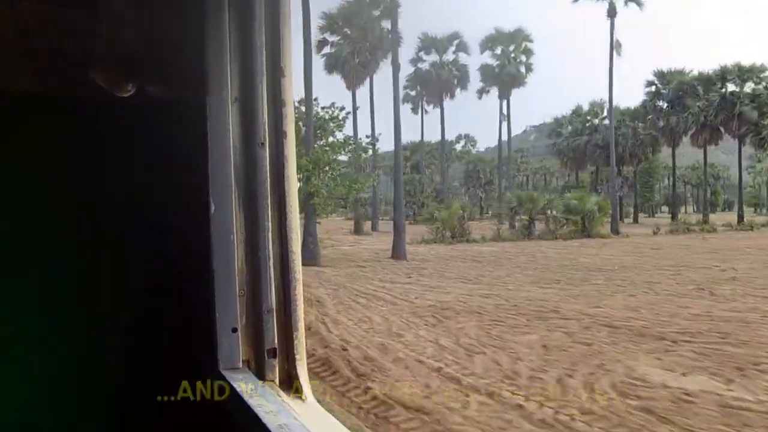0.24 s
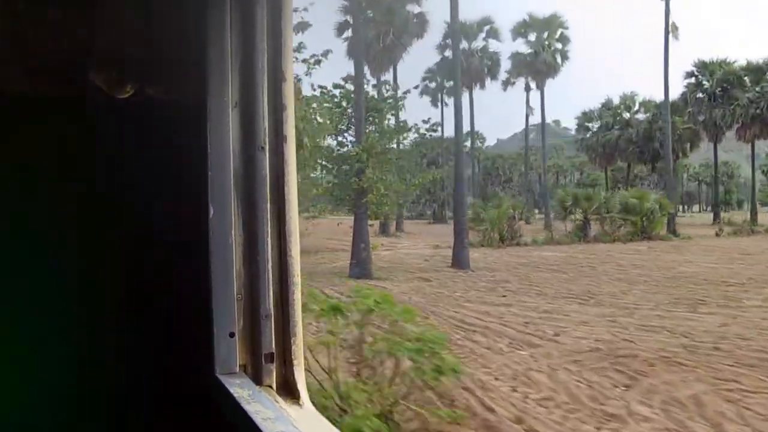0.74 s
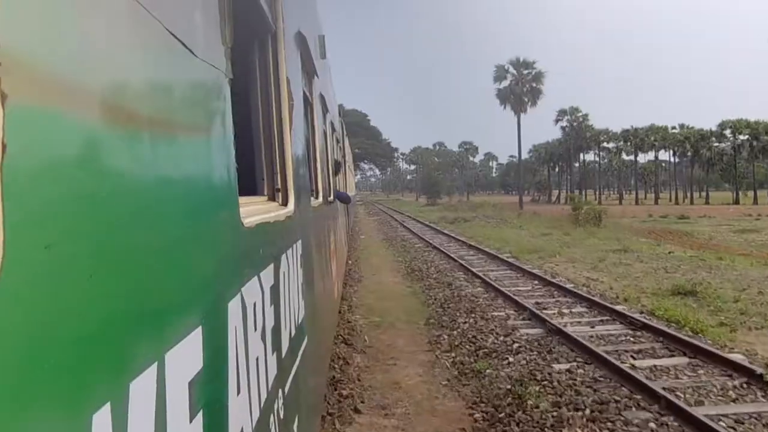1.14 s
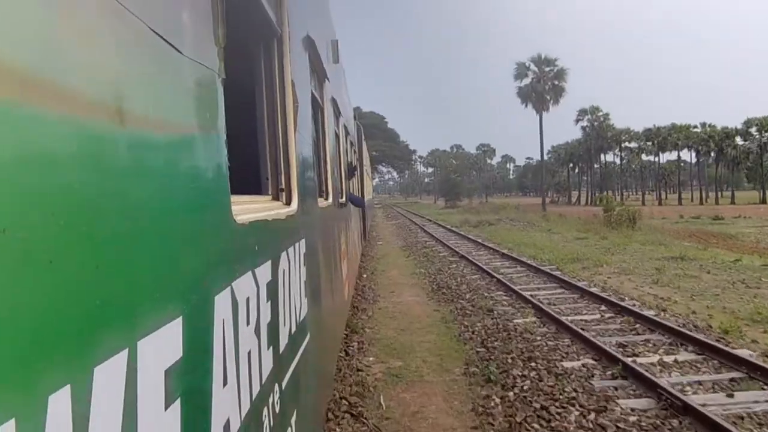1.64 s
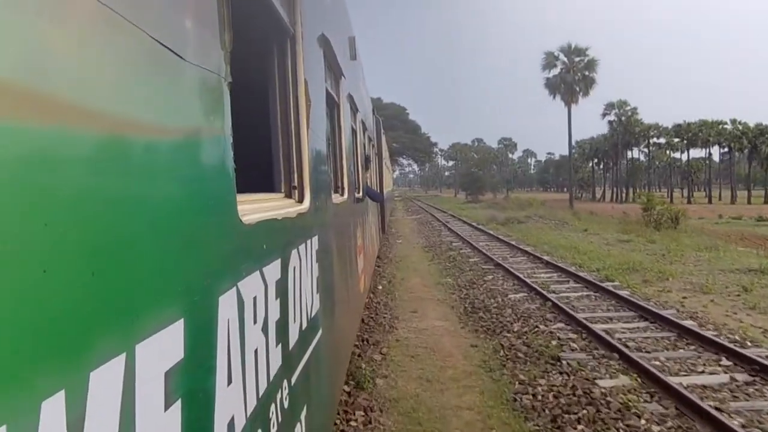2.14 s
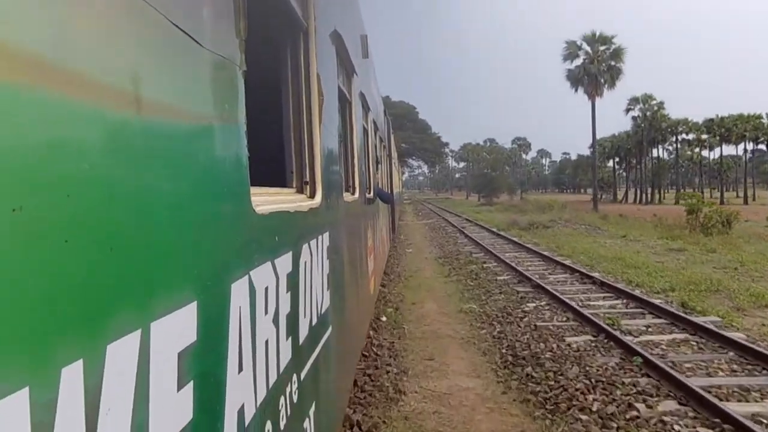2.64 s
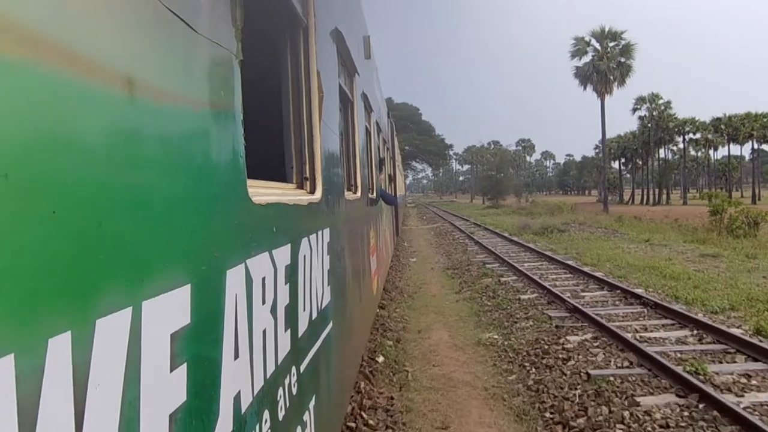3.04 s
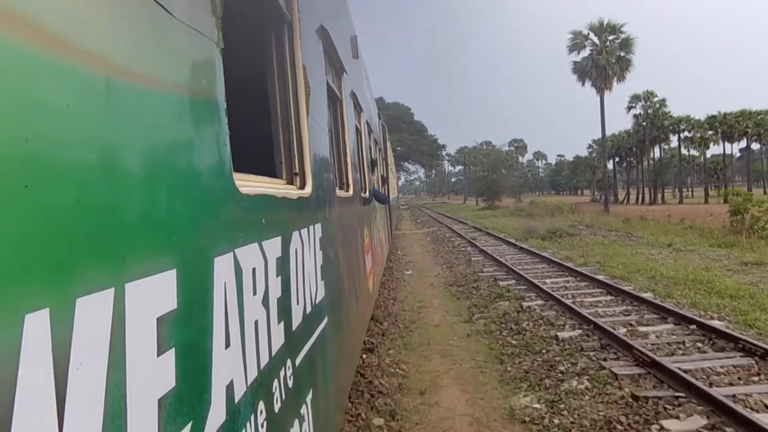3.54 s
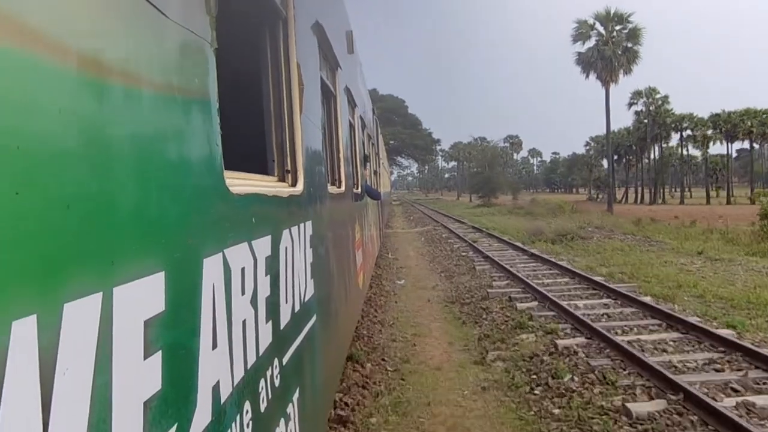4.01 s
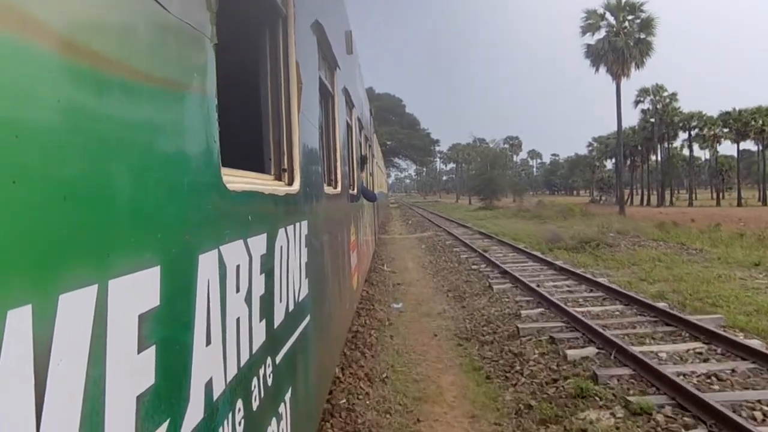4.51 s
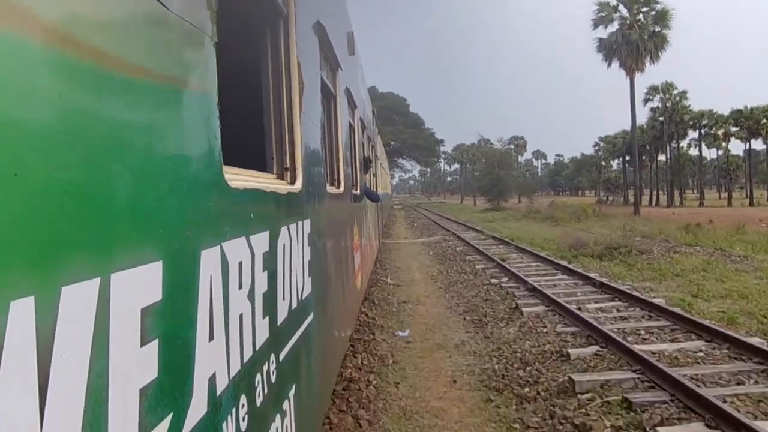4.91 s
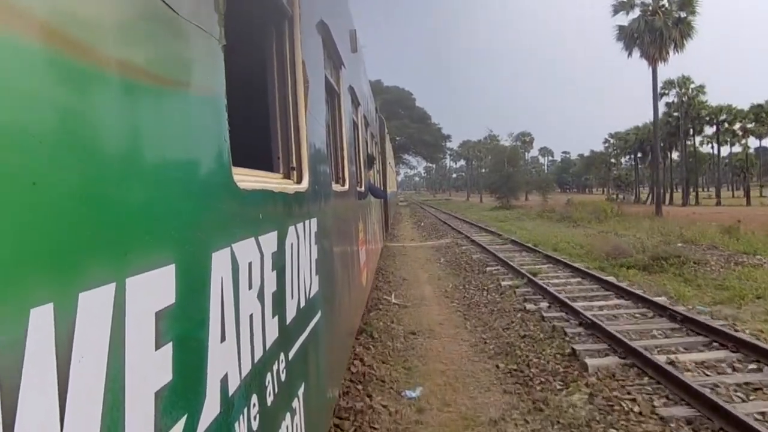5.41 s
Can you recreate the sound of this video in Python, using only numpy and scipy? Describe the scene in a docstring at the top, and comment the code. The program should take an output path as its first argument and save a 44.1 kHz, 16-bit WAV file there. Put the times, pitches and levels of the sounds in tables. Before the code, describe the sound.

Wind buffets the microphone in crackling gusts over the steady roar of a moving train.

```python
"""A train rolls on rough rails, heard just inside a window, then outside along the carriage, and for
a last instant in shelter. Wheels and wind make one mid-pitched roar. The slipstream strikes the
microphone's port: small eddies crackle and excite its cavity resonances, larger ones slap, thump and thud.
A low rumble and a faint hiss lie underneath, and the highest peaks saturate the recorder."""
import sys
import numpy as np
from scipy import signal
from scipy.fft import rfft, irfft
from scipy.io import wavfile
from scipy.ndimage import uniform_filter1d

SR = 44100
rng = np.random.default_rng(int(sys.argv[2]) if len(sys.argv) > 2 else 0)


def persist_wave(psi):
    """Save psi, clipped to +-1, as 16-bit WAV."""
    counts = np.round(np.clip(psi, -1, 1) * 32767).astype(np.int16)
    wavfile.write(sys.argv[1], SR, np.atleast_2d(counts).T)


N = 249667
TIME = np.arange(N) / SR
FREQS = np.maximum(np.fft.rfftfreq(N, 1 / SR), 1)


# Spectrum of the roar of train and wind. Each row: frequency in Hz, relative level in dB.
ROAR_SPECTRUM = [(60, -11.5), (250, -12.5), (450, -6.5), (590, 1.5), (700, 2.5), (850, 1.5), (1000, -2),
                 (1170, -1.5), (1330, -11.5), (1900, -18), (2700, -7.5), (3100, -6.5), (3600, -15.5),
                 (4500, -23), (5300, -26.5)]

def train_and_wind_roar(level_db):
    """Broadband noise: rough wheels on rough rails and the wind blend in a slightly shuddering roar."""
    roar = coloured(rng.standard_normal(N), ROAR_SPECTRUM, 500, 1200)
    return roar * from_db(level_db + 1.3 * drift(rate_hz=27))


# Spectrum of the small eddies. Each row: frequency in Hz, relative level in dB.
RUSH_SPECTRUM = [(100, -27), (400, 0.5), (900, 2), (1400, 3), (1800, 4.5), (2400, 1.5), (3000, -5.5),
                 (3500, -9.5), (4200, -13.5), (4600, -23), (5200, -19), (6000, -60)]

def rush(flow_db):
    """Fine-scale turbulence: small eddies crackle in clumps, louder and brighter in stronger flow."""
    level_db = flow_law(flow_db, cruise_db=-25, slope=1.014)
    treble_db = flow_law(flow_db, cruise_db=-1.8, slope=0.85)
    crackle = coloured(eddies(per_s=5000, spread_db=3.0), RUSH_SPECTRUM, 1400, 2600)
    treble = irfft(rfft(crackle) / (1 + (3500 / FREQS) ** 8), N)
    shelved = crackle + treble * (from_db(treble_db) - 1)
    return shelved * from_db(level_db + 1.6 * drift(rate_hz=47))


# Spectrum of the large eddies. Each row: frequency in Hz, relative level in dB.
BUFFET_SPECTRUM = [(30, -21.5), (70, -5.5), (130, 1), (330, 6), (550, 4.5), (900, -1), (1500, -25),
                   (3000, -29.5), (6000, -51)]

def buffeting(level_db):
    """Large-scale turbulence: the pressure of big eddies thumps on the port in uneven lumps."""
    thumps = coloured(eddies(per_s=1500, spread_db=2.5), BUFFET_SPECTRUM, 100, 450)
    return thumps * from_db(level_db + 0.73 * drift(rate_hz=45))


# Sharp slaps of air on the port. Each row: time in seconds, peak level in dB.
AIR_SLAPS = [(1.065, -6.5), (1.130, -4.5), (1.534, -2.5), (1.617, -0.5), (1.682, -12), (1.721, -3),
             (1.769, -6), (1.842, 0.5), (2.15, -4.5), (2.184, -0.5), (3.895, -4), (4.886, -6), (5.144, -3)]
# Deep thuds of the largest eddies. Each row: time in seconds, peak level in dB.
EDDY_THUDS = [(1.520, -16), (1.620, -12.5), (3.565, -12), (4.600, -10), (4.810, -10)]

def eddy_impacts(impacts, width_s, band_hz):
    """Pressure transients: single eddies swell and fade; larger ones last longer and sound lower."""
    pressure = np.zeros(N)
    t = TIME[:SR // 10] - TIME[SR // 20]
    envelope = np.exp(-(t / width_s) ** 2)
    band = signal.butter(6, band_hz, "band", fs=SR, output="sos")
    for time_s, peak_db in impacts:
        burst = signal.sosfilt(band, rng.standard_normal(len(t))) * envelope
        start = max(int(time_s * SR) - SR // 20, 0)
        pressure[start:start + len(t)] += from_db(peak_db) * burst / np.abs(burst).max()
    return pressure


# Spectrum of the rumble. Each row: frequency in Hz, relative level in dB.
RUMBLE_SPECTRUM = [(10, -20), (20, -4), (30, 2.5), (50, 0.5), (90, -2), (200, -18.5), (1000, -69)]

def rumble(level_db):
    """Wall-pressure fluctuation: the slowest swings along the carriage side are heard as a rumble."""
    gain = from_db(level_db + 1.5 * drift(rate_hz=6))
    return gain * coloured(rng.standard_normal(N), RUMBLE_SPECTRUM, 20, 70, window_samples=6000)


# Airflow just inside the window. Each row: time in seconds, strength in dB.
FLOW_AT_WINDOW = [(0.02, -29), (0.474, -37), (0.96, -32.5), (0.98, -32.5)]
# Airflow outside, along the carriage. Each row: time in seconds, strength in dB.
FLOW_OUTSIDE = [(1.06, -13), (1.42, -21.5), (1.52, -16.5), (1.82, -13.5), (2.24, -16.5), (2.34, -19),
                (2.55, -17.5), (2.6, -23), (2.66, -20), (2.87, -22), (3.16, -23), (3.69, -17.5),
                (3.74, -19.5), (4.0, -17.5), (4.11, -23.5), (4.19, -14.5), (4.27, -20.5), (4.72, -19.2),
                (5.05, -24.5), (5.14, -19), (5.34, -25.5), (5.58, -25)]

def airflow():
    """Wind shielding: the flow at the microphone, in dB, is strong outside and weak in shelter."""
    window_db = np.interp(TIME, *np.transpose(FLOW_AT_WINDOW))
    outside_db = np.interp(TIME, *np.transpose(FLOW_OUTSIDE))
    return by_position(window_db, outside_db, sheltered=-44)


# Gusts that break on the port. Each row: start in seconds, length in seconds,
# then the levels it adds to the buffeting, the rumble and the roar, in dB.
PORT_GUSTS = [(0.045, 0.026, -30, -32, -31), (0.165, 0.09, -35, -36, -29.5), (1.04, 0.018, -20.5, -44, -24),
              (1.128, 0.051, -18, -37, -25), (1.5, 0.041, -23, -24, -26), (1.608, 0.016, -11.5, -33, -18),
              (1.67, 0.04, -13.5, -29, -15), (1.814, 0.062, -16.5, -32, -14.5),
              (1.914, 0.037, -18, -32, -21), (1.994, 0.058, -17.5, -42, -21),
              (3.495, 0.053, -17.5, -30, -28), (3.653, 0.052, -19, -35, -27), (3.858, 0.022, -17, -46, -32),
              (3.972, 0.047, -23.5, -39, -31), (4.203, 0.061, -25, -36, -21.5),
              (4.365, 0.035, -24.5, -42, -19.5), (4.473, 0.34, -23, -38, -30),
              (5.297, 0.26, -32.5, -39, -30.5)]

def gusts(attack_s=0.011, release_s=0.028):
    """Intermittency: gusts build, hold and decay; their powers add to three level curves in dB."""
    power = np.full((3, N), 1e-12)
    for start_s, length_s, *levels_db in PORT_GUSTS:
        attack = np.clip(1 + (TIME - start_s) / attack_s, 0, 1)
        release = np.exp(-np.clip(TIME - start_s - length_s, 0, 1) / release_s)
        power += np.outer(from_db(levels_db), attack * release) ** 2
    return 10 * np.log10(power)


# Resonances behind the port. Each row: frequency in Hz, bandwidth in Hz, gain in dB.
CAVITY_MODES = [(2820, 250, 3.5), (3033, 118, 7), (4230, 266, 9)]

def microphone(pressure, notch_hz=691.3, notch_width_hz=51, cutoff_hz=5820, leak_db=-23.5):
    """Cavity resonance: modes ring, one narrow band cancels, and the port passes little high treble."""
    for hz, width_hz, gain_db in CAVITY_MODES:
        ringing = signal.lfilter(*signal.iirpeak(hz, hz / width_hz, fs=SR), pressure)
        pressure = pressure + (from_db(gain_db) - 1) * ringing
    pressure = signal.lfilter(*signal.iirnotch(notch_hz, notch_hz / notch_width_hz, fs=SR), pressure)
    passed = signal.sosfilt(signal.cheby1(12, .2, cutoff_hz, fs=SR, output="sos"), pressure)
    leak = signal.sosfilt(signal.butter(6, [6900, 9900], "band", fs=SR, output="sos"), pressure)
    return passed + from_db(leak_db + drift(rate_hz=4)) * leak   # the faint treble swells and fades


def hiss(rms_db=-76):
    """Self-noise: the microphone adds a faint white hiss of its own."""
    return from_db(rms_db) * rng.standard_normal(N)


def eddies(per_s, spread_db):
    """A Poisson process: random pressure kicks of either sign and uneven size, with rms 1."""
    arrivals = rng.random(N) < per_s / SR
    sizes = from_db(spread_db * np.clip(rng.standard_normal(N), -2, 2))
    kicks = arrivals * sizes * rng.choice([-1, 1], N)
    return kicks / kicks.std()


def coloured(source, colour, low_hz, high_hz, window_samples=2600):
    """Spectral shaping: filters a source and holds its rms near 1 between two frequencies."""
    hz, db = np.transpose(colour)
    spectrum = rfft(source) * from_db(np.interp(np.log(FREQS), np.log(hz), db))
    band = irfft(spectrum * ((FREQS > low_hz) & (FREQS < high_hz)), N)
    power = uniform_filter1d(uniform_filter1d(band ** 2, window_samples), window_samples)
    return irfft(spectrum, N) / np.sqrt(power + 1e-20)


def drift(rate_hz):
    """Random modulation: low-passed noise of spread 1 that moves at about the given rate."""
    slow = irfft(rfft(rng.standard_normal(N)) / (1 + (FREQS / rate_hz) ** 2), N)
    return slow / slow.std()


def by_position(window, outside, sheltered, out_s=1.021, back_s=5.601, fade_s=0.0089):
    """Linear crossfade: takes the value for where the microphone is at each moment."""
    gone_out, come_back = [np.clip((TIME - s) / fade_s, 0, 1) for s in (out_s, back_s)]
    return window + gone_out * (outside - window) + come_back * (sheltered - outside)


def flow_law(flow_db, cruise_db, slope, cruise_flow_db=-22):
    """A power law: the level is cruise_db at cruising flow and gains slope dB per dB of flow."""
    return cruise_db + slope * (flow_db - cruise_flow_db)


def power_sum(a_db, b_db):
    """Incoherent addition: unrelated sounds add in power; the result is in dB."""
    return 10 * np.log10(from_db(a_db) ** 2 + from_db(b_db) ** 2)


def from_db(db):
    """The decibel scale: amplitude grows tenfold every 20 dB."""
    return 10 ** (np.asarray(db) / 20)


def scene():
    """Superposition: the train rolls on; the joint roar of train and wind swells with flow and gusts."""
    flow_db = airflow()
    gust_buffet_db, gust_rumble_db, gust_roar_db = gusts()
    shelter_db = by_position(window=0, outside=0, sheltered=-4)
    roar_db = power_sum(flow_law(flow_db, cruise_db=-23.5, slope=0.33) + shelter_db, gust_roar_db)
    buffet_db = power_sum(flow_law(flow_db, cruise_db=-29, slope=0.7), gust_buffet_db)
    rumble_db = power_sum(flow_law(flow_db, cruise_db=-41, slope=0.12), gust_rumble_db)
    slaps = eddy_impacts(AIR_SLAPS, width_s=0.0016, band_hz=(700, 2800))
    thuds = eddy_impacts(EDDY_THUDS, width_s=0.0074, band_hz=(77.4, 263))
    turbulence = buffeting(buffet_db) + rush(flow_db) + rumble(rumble_db) + slaps + thuds
    return (microphone(train_and_wind_roar(roar_db) + turbulence) + hiss())[None]


def record(dry, knee=0.88, cutoff_hz=15900):
    """Soft saturation: peaks above the knee are squashed toward full scale, then the top treble is cut."""
    linear = np.clip(dry, -knee, knee)
    squashed = linear + (1 - knee) * np.tanh((dry - linear) / (1 - knee))
    return signal.sosfilt(signal.ellip(10, .1, 70, cutoff_hz, fs=SR, output="sos"), squashed)


dry = scene()
out = record(dry)
persist_wave(out)
```